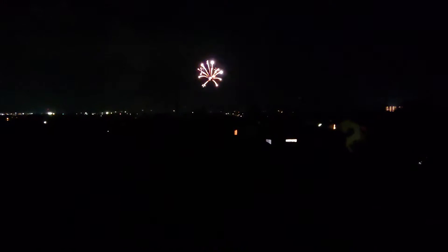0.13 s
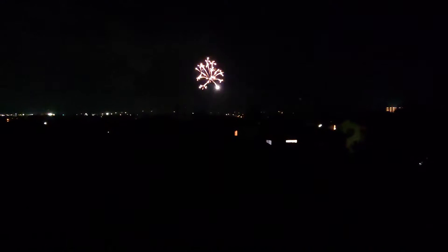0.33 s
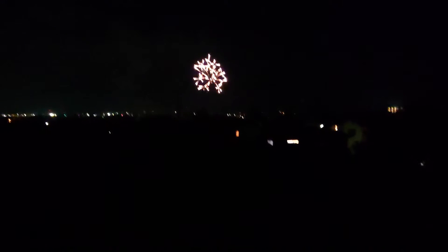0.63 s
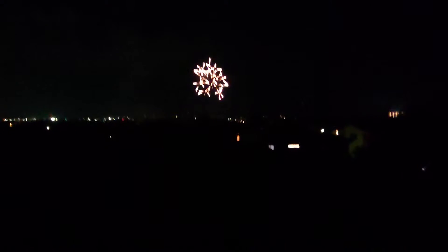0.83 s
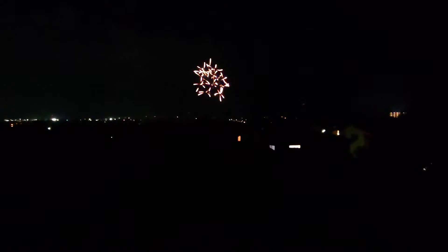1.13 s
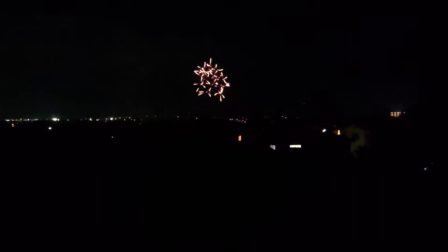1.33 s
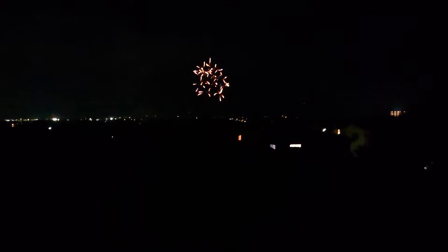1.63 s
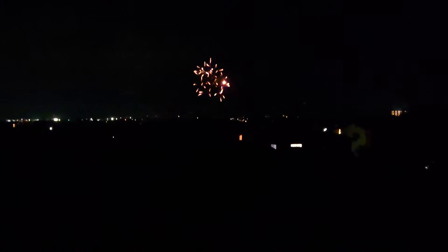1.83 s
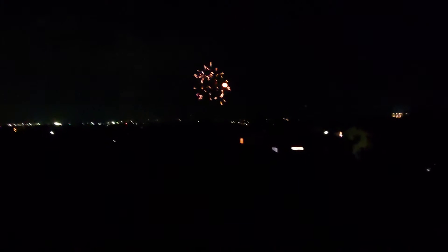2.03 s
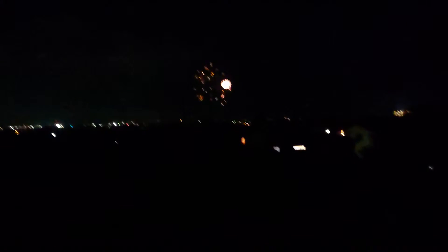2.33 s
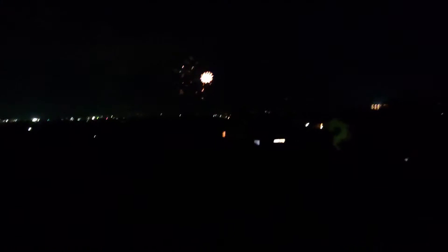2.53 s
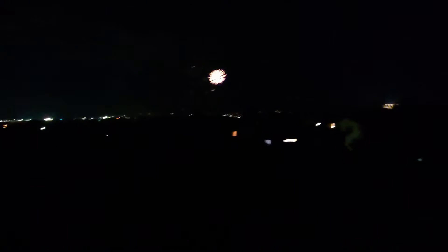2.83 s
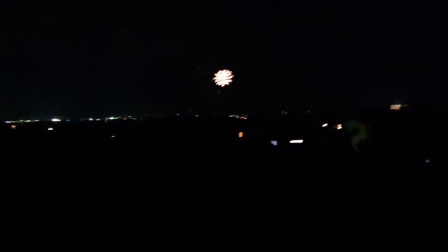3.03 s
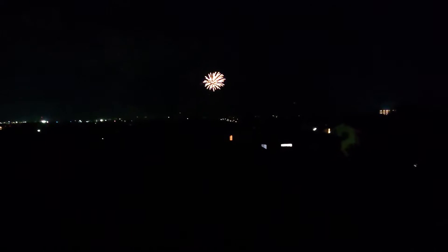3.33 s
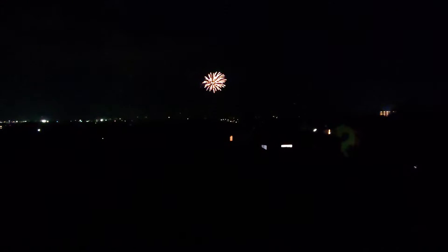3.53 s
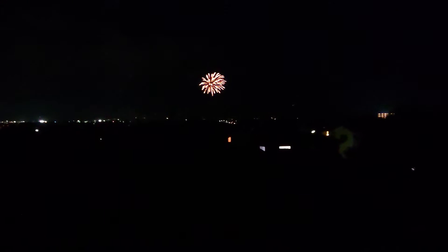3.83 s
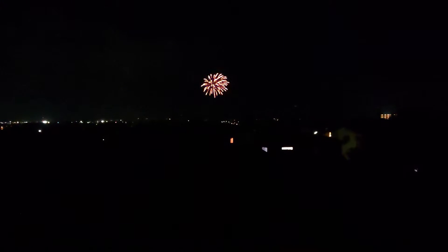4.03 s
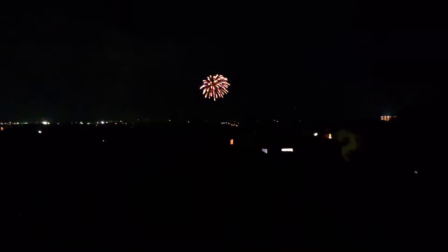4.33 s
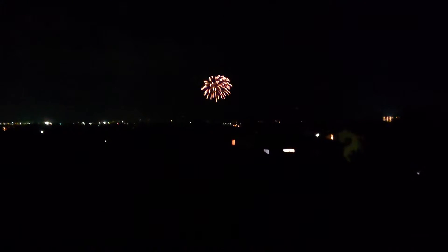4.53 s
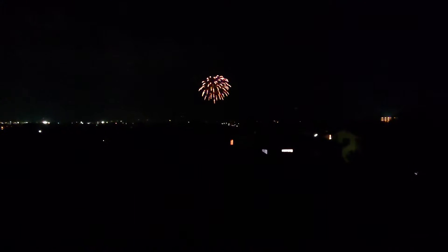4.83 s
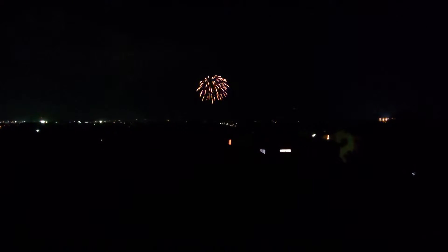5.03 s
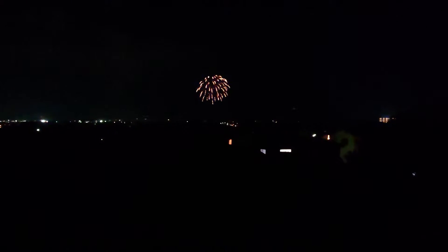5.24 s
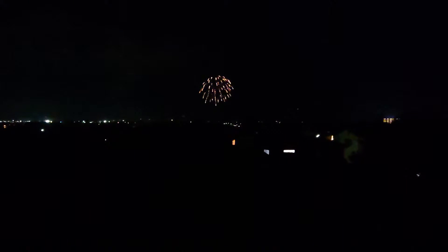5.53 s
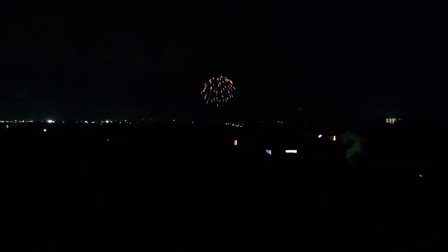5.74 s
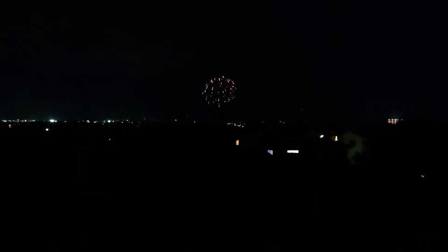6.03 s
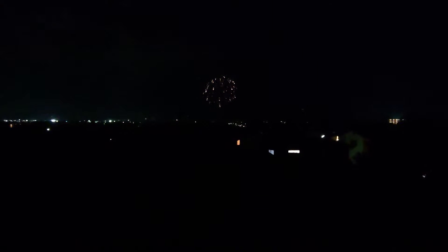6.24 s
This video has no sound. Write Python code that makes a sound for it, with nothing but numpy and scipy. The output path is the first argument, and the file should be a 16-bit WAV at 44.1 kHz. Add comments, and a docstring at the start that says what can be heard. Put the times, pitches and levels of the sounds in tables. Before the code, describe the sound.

Heard on a hand-held phone, a quiet night town carries soft hiss, faint crickets and a far engine drone. A few handling knocks tap on the right side. A distant firework shell bangs sharply and echoes, a cluster of smaller pops follows, and another loud boom fades in a low roll across the houses.

```python
"""A town at night, heard on a hand-held phone: far-off firework shells give two heavy bangs and a
volley of small pops. Each shock wave returns from walls, then scatters off the houses and rolls away.
Light knocks on the phone's case reach only the right microphone. Under it all lie night air, a far low
drone, an engine's hum, the wing strokes of crickets and hiss, mostly from the left microphone."""
import sys
import numpy as np
from scipy import signal
from scipy.fft import rfft, irfft
from scipy.io import wavfile
from scipy.ndimage import uniform_filter1d

SR = 44100
rng = np.random.default_rng(int(sys.argv[2]) if len(sys.argv) > 2 else 0)


def to_wav(sig):
    """Store sig (one row per channel, or 1-D mono) as 16-bit WAV at the path in sys.argv[1].

    Samples outside -1..1 are clipped; the rate is SR.
    """
    pcm = np.clip(np.atleast_2d(sig), -1, 1) * 32767
    pcm = np.round(pcm).astype(np.int16)
    wavfile.write(sys.argv[1], SR, pcm.T)  # frames by channels


N = 281358
T = np.arange(N) / SR
FREQS = np.fft.rfftfreq(N, 1 / SR)
WHITE_GAIN = np.sqrt(SR / 2)  # brings unit noise to 0 dB per Hz


def undb(db):
    """Decibels to gain."""
    return 10 ** (np.asarray(db) / 20)


def across(freqs, hz, values):
    """Join points by straight lines on a log-frequency axis."""
    return np.interp(np.log(freqs + 1), np.log(hz), values)


def colour(x, hz, db):
    """EQ a sound through a few points; minimum phase, so that attacks stay sharp."""
    cepstrum = irfft(np.log(undb(across(FREQS, hz, db))), N)
    fold = 1 + np.sign(np.fft.fftfreq(N))
    return irfft(rfft(x) * np.exp(rfft(cepstrum * fold)), N)


def butter(x, hz, kind="low", order=2):
    """Smooth causal low-pass or high-pass."""
    return signal.sosfilt(signal.butter(order, min(hz, .45 * SR), kind, fs=SR, output="sos"), x)


def add(out, sound, start_s):
    """Mix a sound in at its start time."""
    i = max(int(round(start_s * SR)), 0)
    out[i:i + len(sound)] += sound[:max(len(out) - i, 0)]


def walk(rate_hz):
    """Smooth random drift with a spread near 1."""
    step = int(SR / rate_hz)
    return 1.3 * uniform_filter1d(np.repeat(rng.standard_normal(N // step + 1), step), step)[:N]


def diffuse(size, alike_hz, lag_ms):
    """Stereo spectra of noise from the left: later on the right, and unrelated in the treble."""
    freqs = np.fft.rfftfreq(size, 1 / SR)
    alike = .85 / (1 + (freqs / alike_hz) ** 2)
    mid, side = rfft(rng.standard_normal((2, size)))
    pair = (mid * np.sqrt(1 + alike) + side * np.sqrt(1 - alike) * np.array([[1], [-1]])) / np.sqrt(2)
    return pair * np.exp(-2j * np.pi * freqs * np.array([[0], [lag_ms]]) / 1000)


def through(x, response):
    """A sound as its surroundings return it to the two microphones."""
    return signal.fftconvolve(x[None], response, axes=1)[:, :N]


def night_air(flicker_db=0.74):
    """A soft, nearly even bed of air noise over the town."""
    # air spectrum: freq_hz, left_db_per_hz, right_db_per_hz
    spectrum = [(25.3, -90.5, -78.5), (93, -85.5, -86.5), (150, -81, -84.5), (234, -88, -86),
                (521, -93, -96), (670, -91, -84), (970, -88.5, -93), (1920, -90.5, -91.5),
                (3073, -100.5, -83.5), (3170, -109.5, -95), (3690, -87.5, -91), (4310, -99, -106.0),
                (5460, -93, -100.1), (6170, -131, -129), (6860, -142, -142)]
    hz, *sides_db = np.transpose(spectrum)
    noise = WHITE_GAIN * irfft(diffuse(N, alike_hz=1700, lag_ms=0.39), N)
    air = np.array([colour(x, hz, db) for x, db in zip(noise, sides_db)])
    return air * undb(flicker_db * walk(2))


def microphone_hiss(right_db=-28):
    """The microphones' own high hiss, mostly in the left one."""
    # hiss spectrum: freq_hz, left_db_per_hz
    spectrum = [(8000, -130.6), (9700, -106.7), (11000, -95.5), (12000, -90), (13200, -84), (15600, -88.5)]
    hiss = colour(WHITE_GAIN * rng.standard_normal((2, N)), *np.transpose(spectrum))
    return hiss * undb([[0], [right_db]])


def drone_and_roll(drone_db=-66.5, roll_db=-54, roll_at_s=5.42, roll_width_s=.11):
    """A far low drone; a brief low roll swells just after the second heavy bang."""
    # low bands: centre_hz, width_hz, relative_db
    bands = [(231, 30, -5), (304, 71, -6.5), (372, 19, -6)]
    shape = sum(undb(db) / (1 + (2 * (FREQS - hz) / width) ** 2) for hz, width, db in bands)
    drone = irfft(diffuse(N, alike_hz=1700, lag_ms=0.06) * shape, N)
    roll = undb(roll_db) / np.hypot(1, (T - roll_at_s) / roll_width_s)
    return drone / drone.std() * np.hypot(undb(drone_db), roll)


def engine_hum():
    """Low tones of a far engine beat against each other; faint whines waver above."""
    # hum tones and whines: pitch_hz, left_rms_db, right_rms_db, wander_hz
    tones = [(52, -62, -57, 0.047), (66.7, -64.5, -61.5, 0.059), (74.6, -57.5, -62, 0.32),
             (222.5, -67, -64.5, 1.32), (1473, -69, -122.5, 3.06), (2270, -98, -68.5, 2.95),
             (2986, -67.5, -98, 8.12)]
    out = 0
    for hz, left_db, right_db, wander_hz in tones:
        phase = 2 * np.pi * (np.cumsum(hz + wander_hz * walk(9)) / SR + rng.random())
        out = out + np.sqrt(2) * np.sin(phase) * undb([[left_db], [right_db]])
    return out


def crickets(jitter=.08, spread_db=2.0, gate_edge=.25):
    """Each wing stroke is a short tone that falls in pitch; the strokes come in regular phrases."""
    # one row a cricket: pitch_hz, fall_hz, strokes_per_s, stroke_s, phrase_period_s, phrase_middle_s,
    # gate_threshold, left_db, right_db
    singers = [(5250, 27, 41, 0.023, .345, 0.022, 0.25, -75.5, -62),
               (3710, 525, 23, .034, 3.4, 4.07, 0.098, -67, -62.5)]
    out = np.zeros((2, N))
    for hz, fall_hz, rate, stroke_s, period_s, middle_s, threshold, *sides_db in singers:
        song, progress = np.zeros(N), np.linspace(0, 1, int(stroke_s * SR))
        for k, (late, loud, sharp) in enumerate(rng.standard_normal((400, 3))):
            pitch = hz + fall_hz * (.5 - progress + jitter * sharp)
            stroke = np.sin(np.pi * progress) * np.sin(2 * np.pi * np.cumsum(pitch) / SR)
            add(song, undb(spread_db * loud) * stroke, (k + jitter * late) / rate)
        cycle = np.cos(np.pi * (T - middle_s) / period_s) ** 2
        phrase = np.clip((cycle - threshold) / gate_edge, 0, 1)
        out += song * phrase * undb(sides_db)[:, None]
    return out


def case_knocks(ref_db=-30, attack_s=0.00091, ring_hz=280, tick_hz=2750, top_hz=3200):
    """The hand shifts on the case: a click, bright tick, short ring and damped thump, hard right."""
    # knocks on the case: start_s, thump_db, thump_hz, click_db
    knocks = [(0.7255, -23, 201, -8), (0.732, -28, 82, -40), (.7530, -19.5, 86, -20), (.817, -45, 105, -30),
              (1.926, -26.5, 108, -47), (2.3552, -24.5, 111, -45), (2.379, -35, 121, -31.5),
              (2.423, -32.5, 115, -32), (2.468, -35, 97, -37), (2.539, -39.5, 96, -37),
              (2.645, -43, 103, -37), (2.743, -34.5, 100, -59), (2.8863, -23, 119, -54),
              (2.9436, -39, 109.5, -20.5), (3.7083, -29.5, 164, -22), (4.4706, -43, 105.4, -30),
              (4.54, -44, 113, -34), (4.596, -52, 131, -28), (5.4691, -29, 114, -20),
              (5.797, -55, 131, -31.5)]
    out, t = np.zeros(N), T[:SR // 8]
    ring = undb(-11) * np.sin(2 * np.pi * ring_hz * t) * np.exp(-t / 0.0045)
    tick = undb(-11) * np.sin(2 * np.pi * tick_hz * t) * np.exp(-t / 0.00022)
    attack = 1 - np.exp(-(t / attack_s) ** 2)
    for start_s, thump_db, thump_hz, click_db in knocks:
        # a light touch leaves the case freer to ring
        decay_s = 0.0092 / 2 ** ((thump_db - ref_db) / 18)
        thump = 2 * np.sin(2 * np.pi * thump_hz * t) * np.exp(-t / decay_s) * attack
        # a hard knock clicks higher and for more cycles
        click_hz = 825 * 2 ** ((click_db - ref_db) / 40)
        cycles = 0.46 * 2 ** ((click_db - ref_db) / 26)
        click = np.sin(2 * np.pi * click_hz * t) * np.exp(-t * click_hz / cycles)
        add(out, undb(thump_db) * thump + undb(click_db) * (ring + tick - click), start_s)
    return butter(out, top_hz, order=6) * np.array([[0], [1]])


def shock(length_ms, crack_hz, rear_softness=0.18, bass_hz=135, air_hz=4200):
    """An N-shaped pressure wave, steep in front, softer behind; air dulls it, the phone thins its bass."""
    phase = T[:SR // 16] / (length_ms / 1000)
    wave = (1 - 2 * phase) * (1 - np.tanh((phase - 1) / rear_softness)) / 2
    dulled = butter(butter(wave, crack_hz), air_hz)
    return butter(dulled, bass_hz, "high")


def fireworks(right_lag_ms=0.14, second_lag_share=0.735, near_db=5, town_db=1):
    """Each burst arrives by two close paths through the air, a little from the left, then echoes."""
    # shell bursts: start_s, level_db, shock_length_ms, crack_top_hz
    bursts = [(1.76, 2, 2.65, 1940), (3.0161, -15.5, 1.6, 1820), (3.0340, -7.5, 0.8, 2500),
              (3.239, -4.5, 1.2, 910), (3.2492, -8.5, 1.46, 1730), (3.3078, -13, 1.6, 1400),
              (3.3516, -14, 1.78, 3050), (3.361, -4.5, .97, 1480), (3.4021, -16.5, 2.6, 780),
              (3.4093, -13.5, 1.9, 1700), (3.472, -29.5, 1.6, 900), (3.4772, -12.5, 1.5, 1506),
              (3.5076, -10.5, 1.41, 1590), (3.5278, -10.5, 1.6, 1210), (3.55, -9.5, 1.4, 1370),
              (5.0172, -1.5, 3.94, 2220)]
    direct, near_send, town_send = np.zeros((2, N)), np.zeros(N), np.zeros(N)
    for start_s, db, length_ms, crack_hz in bursts:
        wave = undb(db) * shock(length_ms, crack_hz)
        bend_db = -0.5 * np.log2(length_ms / 1.5)  # long waves bend round near surfaces
        add(near_send, undb(near_db + bend_db) * wave, start_s)
        # the stronger the first arrival, the less the second path counts
        second_db = min(-18.5 - 1.3 * db, -2.5)
        add(wave, undb(second_db) * wave, second_lag_share * length_ms / 1000)
        add(direct[0], wave, start_s)
        add(direct[1], wave, start_s + right_lag_ms / 1000)
        add(town_send, undb(town_db) * wave, start_s)
    splinters = through(near_send, near_surfaces())
    echoes = through(town_send, walls() + houses() + horizon())
    return microphone_ports(direct + splinters + echoes)


def near_surfaces(db=-30, attack_s=0.00013, decay_s=0.0085, low_hz=900):
    """Surfaces within a few metres splinter the crack for some milliseconds."""
    t = T[:SR // 8]
    noise = irfft(diffuse(len(t), alike_hz=2500, lag_ms=0.019), len(t))
    envelope = np.exp(-t / decay_s) * (1 - np.exp(-t / attack_s))
    return undb(db) * butter(noise * envelope, low_hz, "high", order=1)


def walls(low_hz=150):
    """A few distinct slaps, each dulled and from its own direction; long waves bend round the walls."""
    # wall reflections: delay_s, level_db, top_hz, right_lag_ms
    slaps = [(0.0152, -15.5, 2000, 0.4), (0.0309, -23, 4520, 0.23), (0.0606, -14.5, 2600, -0.093),
             (.0755, -29.5, 900, .4), (0.0838, -26, 2560, 0.063)]
    out = np.zeros((2, 2 * SR))
    for delay_s, db, top_hz, lag_ms in slaps:
        slap = undb(db) * butter(signal.unit_impulse(SR // 100), top_hz, order=1)
        add(out[0], slap, delay_s)
        add(out[1], slap, delay_s + lag_ms / 1000)
    return butter(out, low_hz, "high", order=1)


def houses(build_s=0.023, clump_db=2.5):
    """The town's reverb: a quick scatter off near houses and a long low roll from far ones."""
    # reverb bands: centre_hz, early_db, early_t60_s, late_db, late_t60_s
    bands = [(60.5, -4, 1, -17.5, 1.9), (134, -9, 0.84, -21.5, 1.95), (270, -30, 0.97, -11, 1.6),
             (464, -11.5, 0.81, -17.5, 2.96), (795, -10.5, 0.89, -22, 7.1), (1500, -6, 0.79, -25, 0.65),
             (3020, -9, 0.74, -16.5, 1.2), (5560, -2, 0.42, -22, 0.76)]
    t = T[:2 * SR]
    freqs = np.fft.rfftfreq(len(t), 1 / SR)
    noise = diffuse(len(t), alike_hz=1500, lag_ms=0.33) / np.sqrt(SR)
    centres, out = [row[0] for row in bands], 0
    for weights, (_, early_db, early_t60, late_db, late_t60) in zip(np.eye(len(bands)), bands):
        band = irfft(noise * across(freqs, centres, weights), len(t))
        rates = np.log(1000) / np.array([early_t60, late_t60])
        power = sum(undb(db) ** 2 * 2 * rate * np.exp(-2 * rate * t)
                    for db, rate in zip((early_db, late_db), rates))
        out = out + band * np.sqrt(power)
    clumps = undb(clump_db * walk(250)[:len(t)])  # the echoes come house by house
    return out * (1 - np.exp(-t / build_s)) * clumps


def horizon(db=-62, top_hz=380, low_hz=190, build_s=0.62, t60_s=7.6):
    """The last of the roll returns from far across the land, faint and dull."""
    t = T[:2 * SR]
    noise = irfft(diffuse(len(t), alike_hz=1200, lag_ms=0.12), len(t))
    rumble = butter(butter(noise, top_hz, order=4), low_hz, "high")
    swell = (1 - np.exp(-t / build_s)) * np.exp(-np.log(1000) * t / t60_s)
    fade_out = np.minimum(2 * (2 - t), 1)
    return undb(db) * swell * fade_out * rumble


def microphone_ports(sound):
    """Each microphone's port colours the bangs in its own way."""
    # port EQ: freq_hz, left_db, right_db
    port_eq = [(60.4, 6.5, 3.5), (124, -1, -2), (235, -0.5, -1.5), (660, 0.5, 0), (930, -3, -3.5),
               (1450, -2, -2.5), (2230, -2, 5), (2820, 0.5, 12.5), (3900, 6.5, -12), (4490, 9.5, 2),
               (6040, 7.5, 1.5), (6640, -22.5, -16.5), (12000, -35, -33)]
    hz, *sides_db = np.transpose(port_eq)
    return np.array([colour(x, hz, db) for x, db in zip(sound, sides_db)])


def scene():
    """Fireworks and case knocks over the night's steady bed, in stereo."""
    return (fireworks() + case_knocks()
            + night_air() + microphone_hiss() + drone_and_roll() + engine_hum() + crickets())


def record(dry):
    """The phone drops the deepest bass and cuts the top."""
    low_hz, top_hz = 36, 15900
    top_cut = signal.ellip(12, .1, 80, top_hz, fs=SR, output="sos")
    return signal.sosfilt(top_cut, butter(dry, low_hz, "high", order=3))


dry = scene()
out = record(dry)
to_wav(out)
```